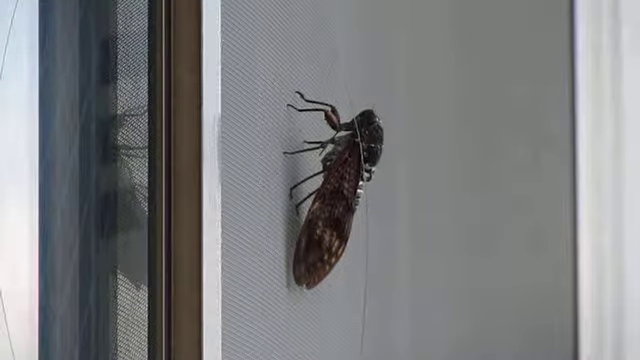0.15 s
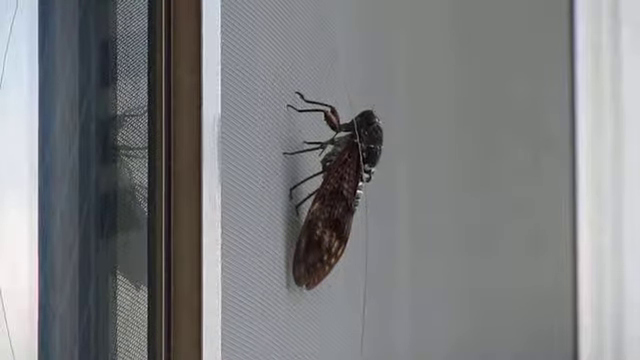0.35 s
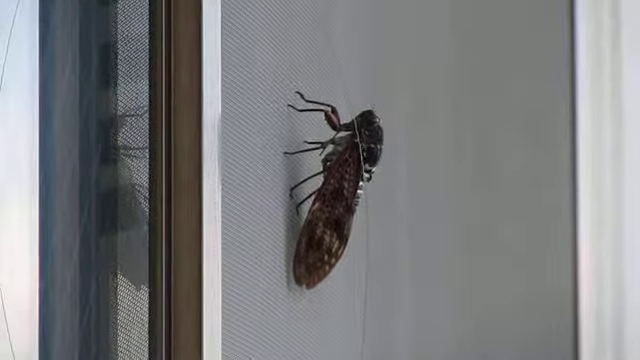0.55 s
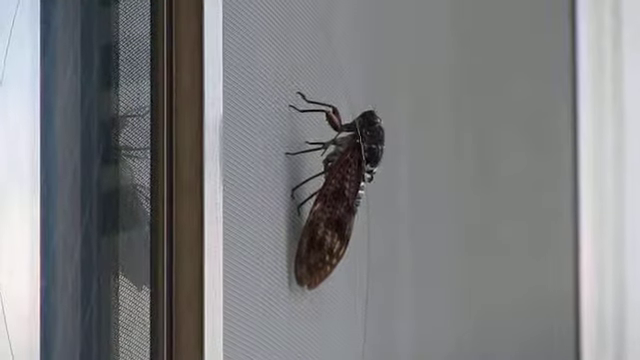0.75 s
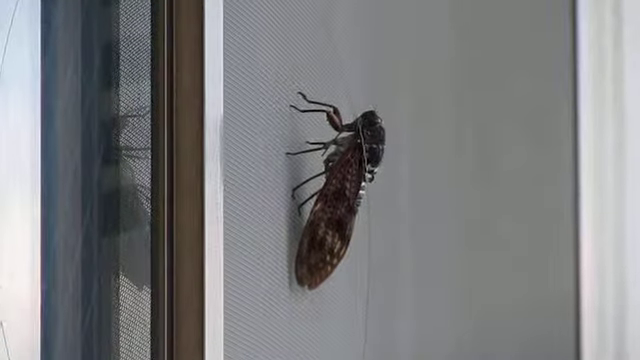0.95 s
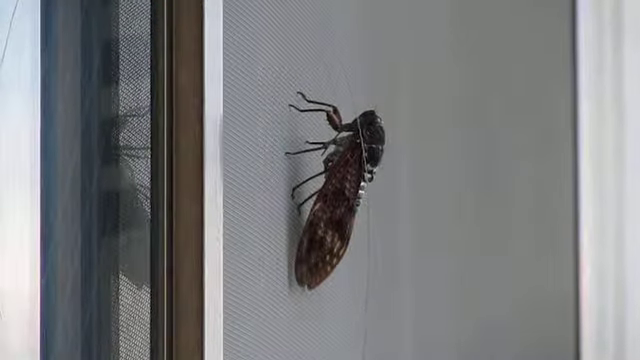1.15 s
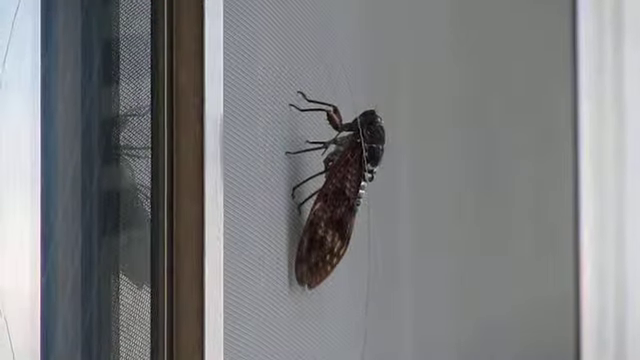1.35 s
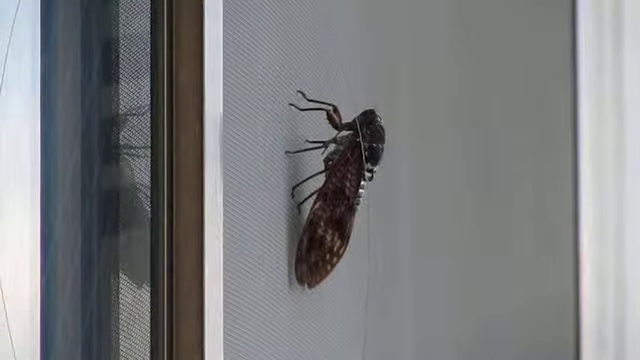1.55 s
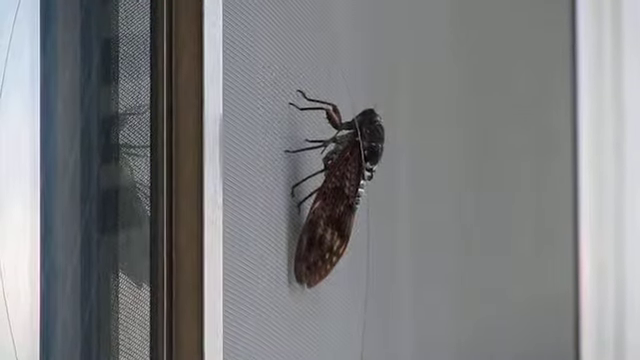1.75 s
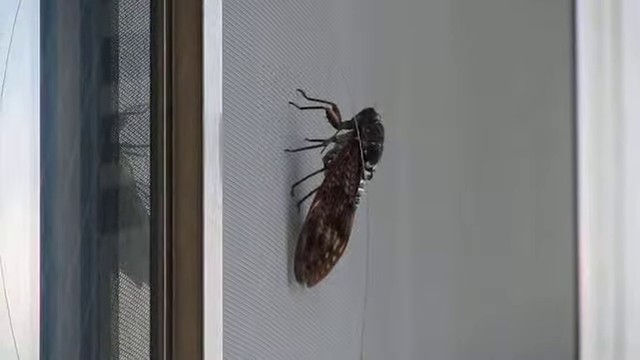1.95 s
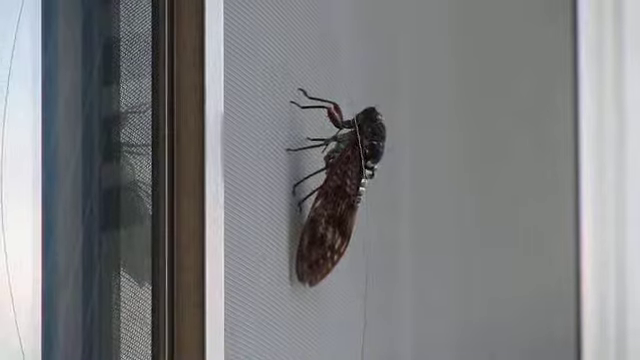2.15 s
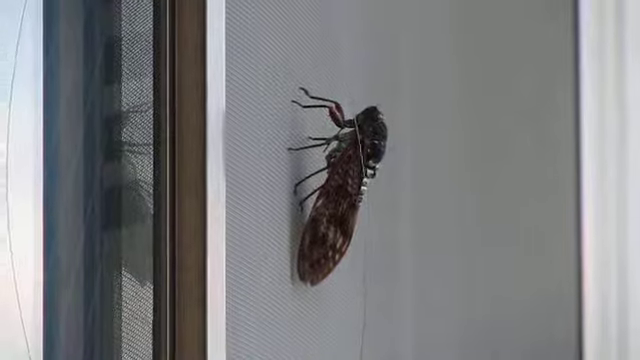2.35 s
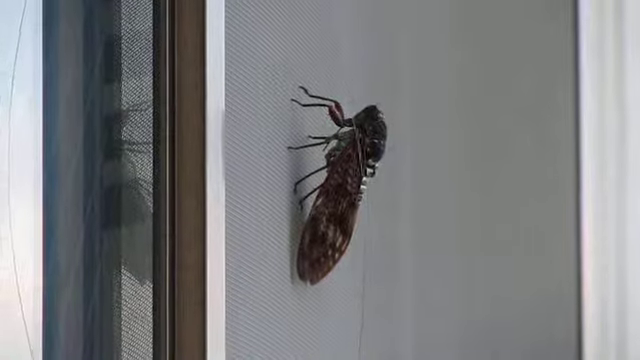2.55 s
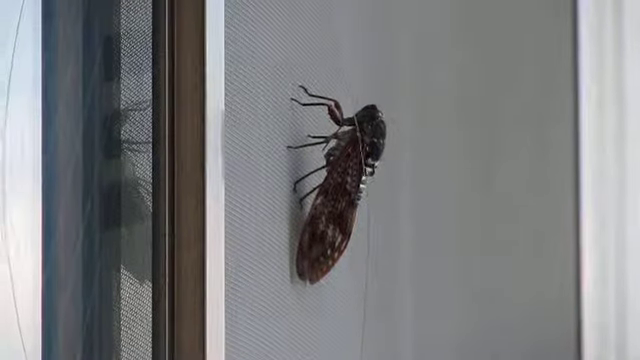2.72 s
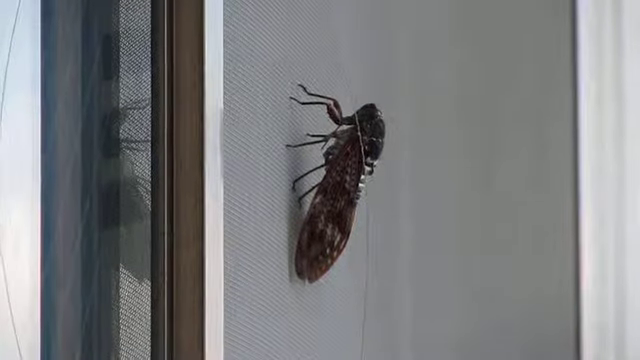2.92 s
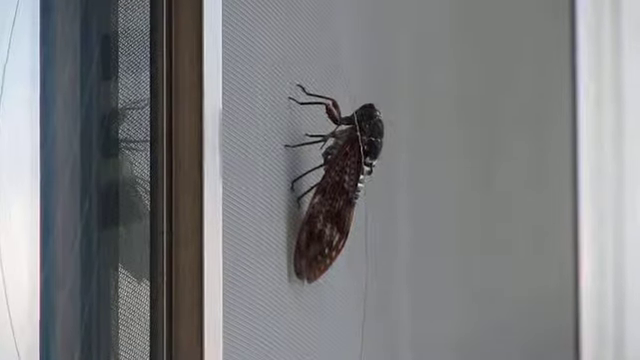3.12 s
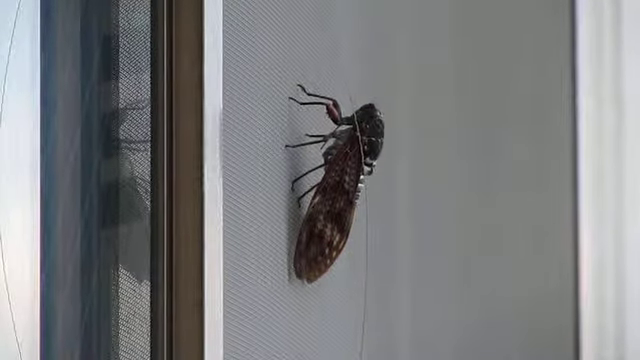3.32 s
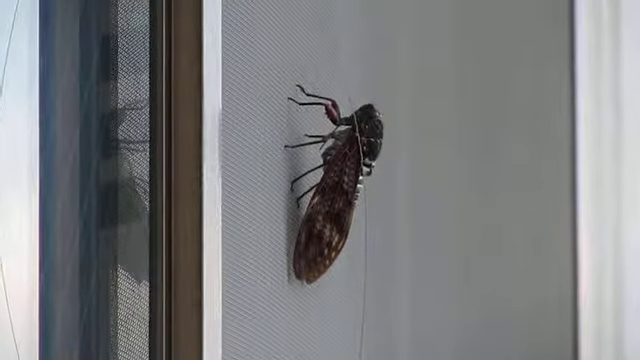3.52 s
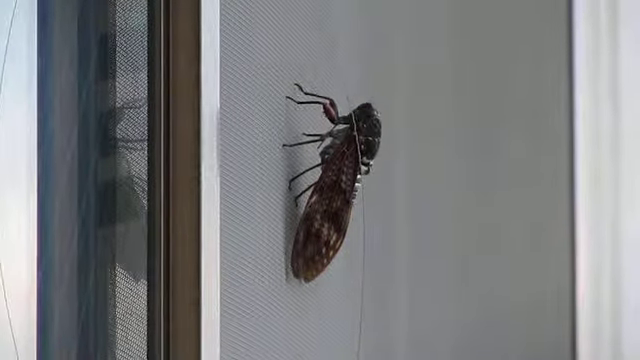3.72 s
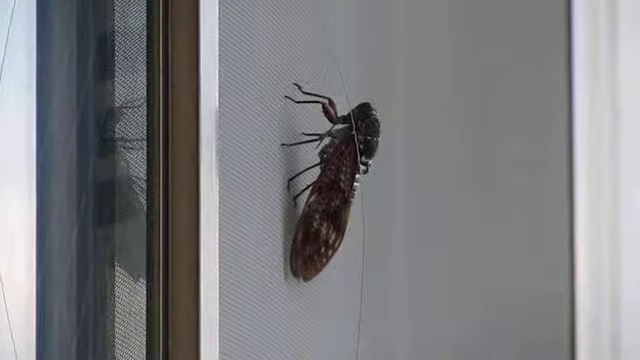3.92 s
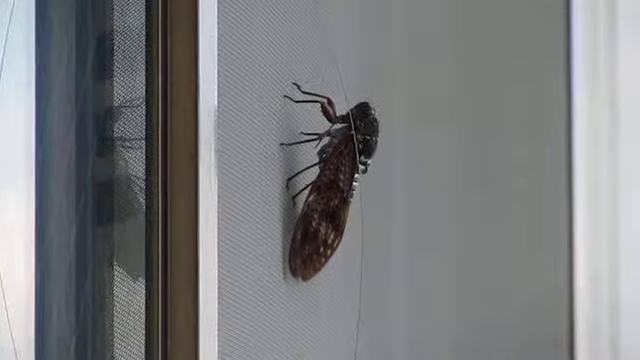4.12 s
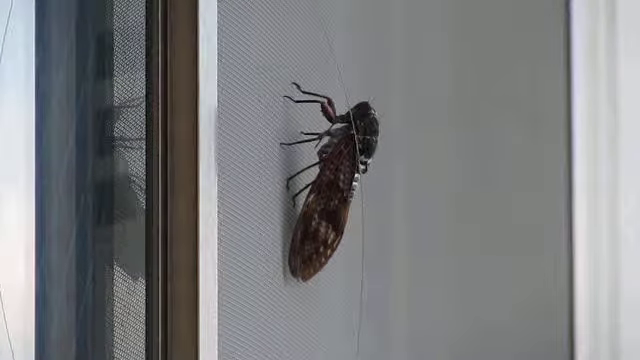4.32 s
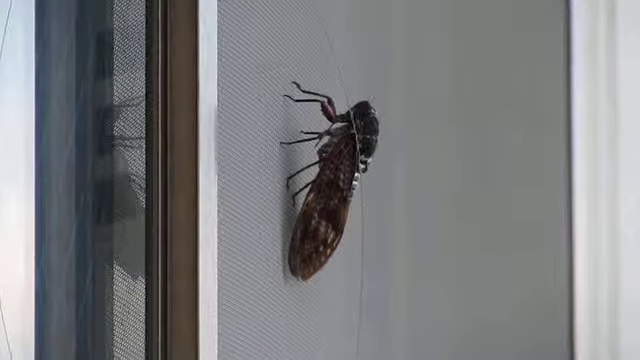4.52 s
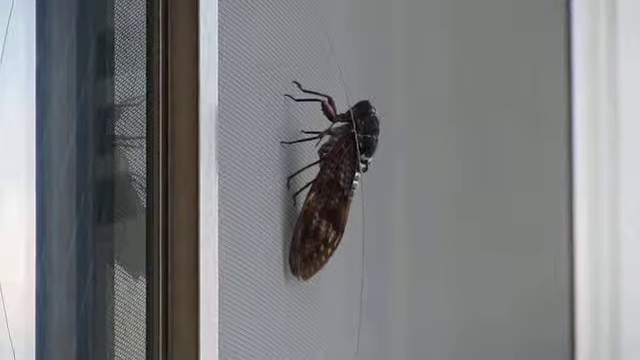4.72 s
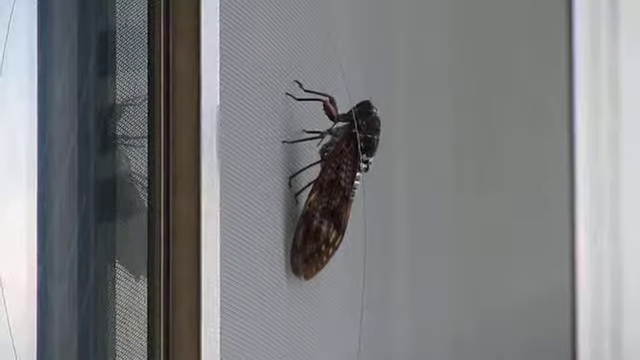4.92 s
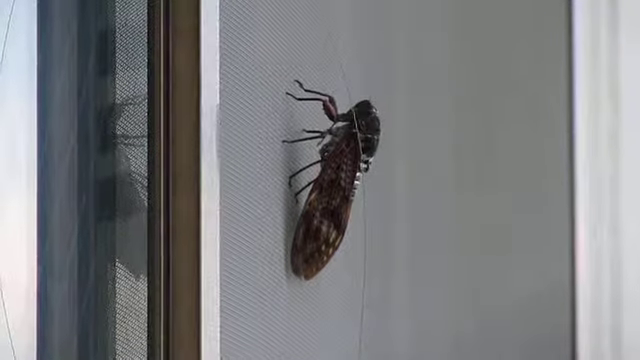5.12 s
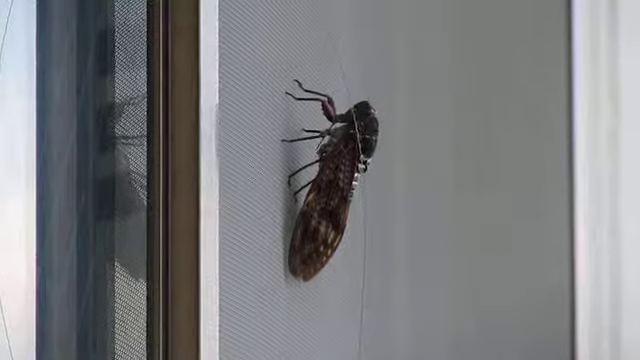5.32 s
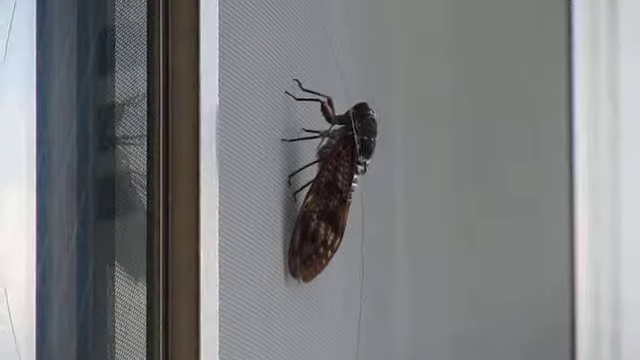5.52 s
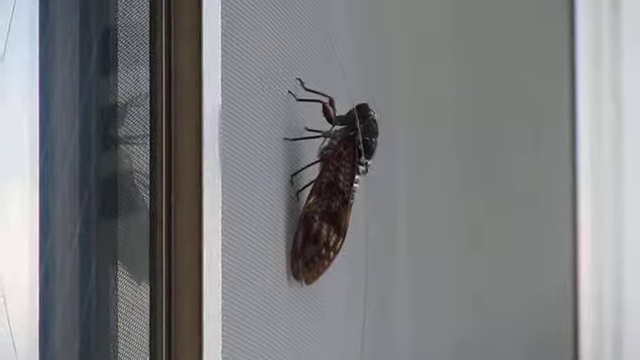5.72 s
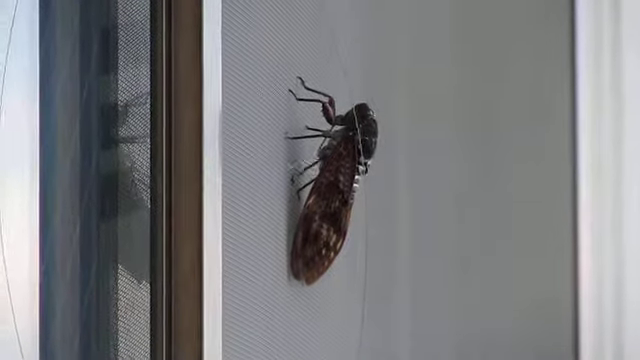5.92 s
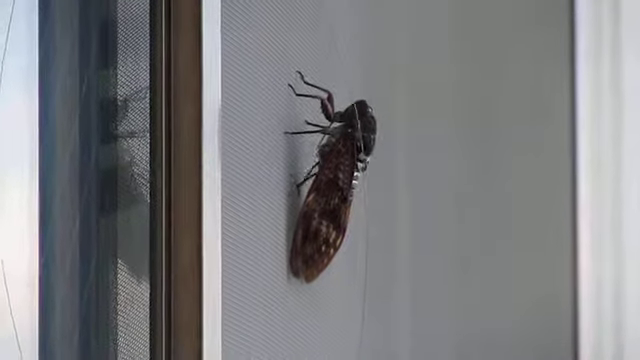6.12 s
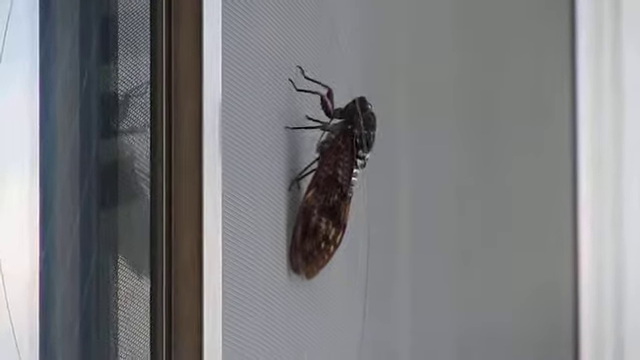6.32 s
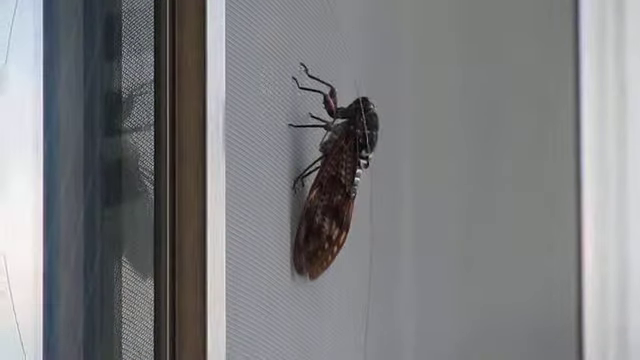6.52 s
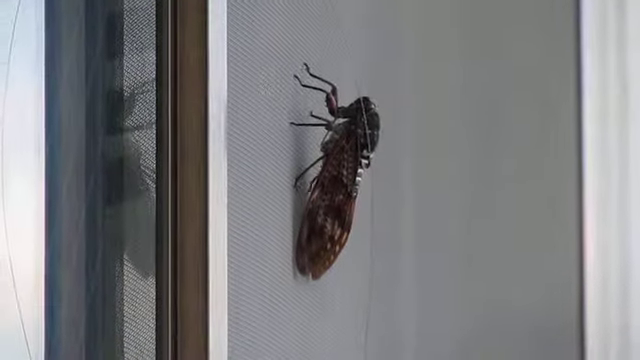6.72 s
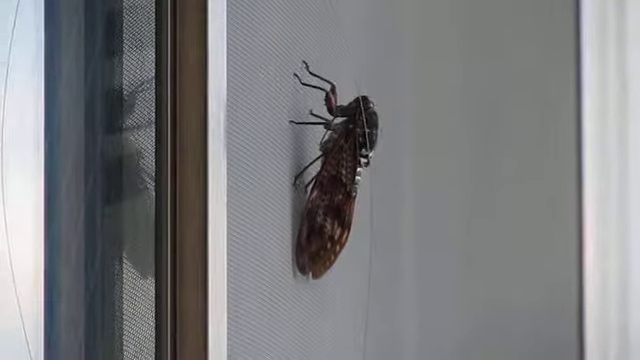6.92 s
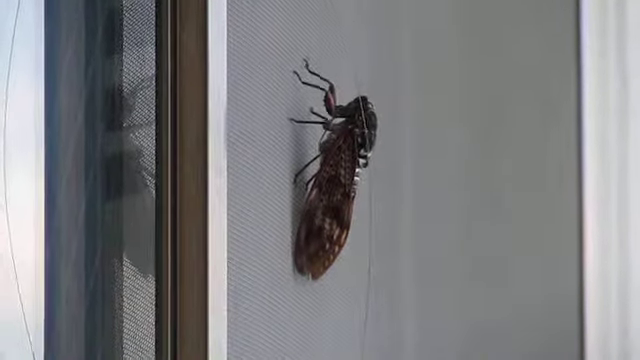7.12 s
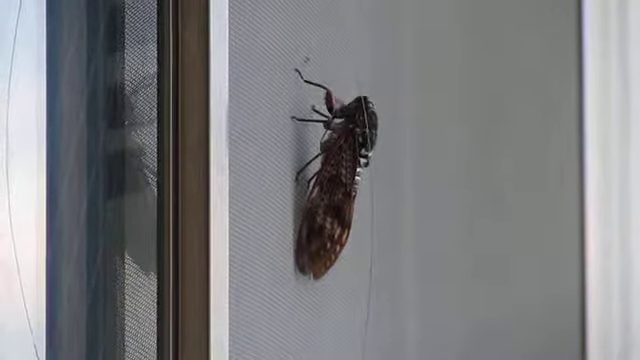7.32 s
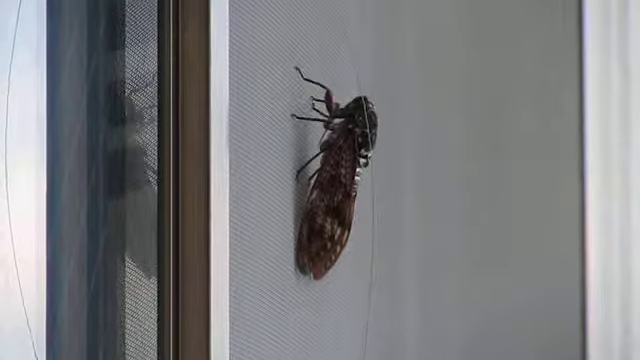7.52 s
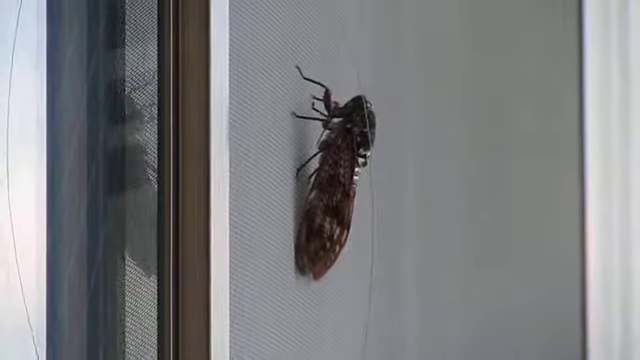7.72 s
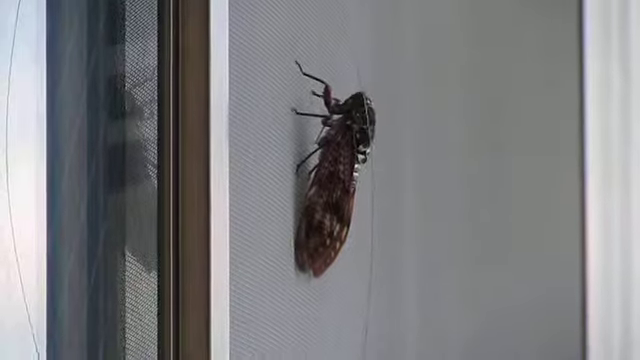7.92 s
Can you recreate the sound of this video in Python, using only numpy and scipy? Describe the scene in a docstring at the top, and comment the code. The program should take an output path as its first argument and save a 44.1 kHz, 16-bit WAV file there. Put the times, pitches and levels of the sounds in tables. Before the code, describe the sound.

A cicada sings very close to the microphone on a window screen for about eight seconds. From 0 to 2.8 s it gives regular, bright, sizzling chirps, roughly sixteen a second, each a short burst of dry clicks rising in pitch, strongest around 5 to 6 kHz. Near 2.85 s the rhythm stumbles into quick, tiny chirps and a short trill; a longer rasp follows at 3.4 s. More stutters come around 4.1 and 4.45 s. Longer buzzing trills stand out at 4.7, 5.4, 6.05, 6.7 and 7.35 s, between runs of increasingly short, clicky, slightly lower and softer chirps, which continue to the end. Tight window echoes add a hard, ringing edge. Far behind is steady low traffic rumble with a faint drone, a slight car rush near 3.3 s and another, fainter, near 7.3 s, plus barely audible dull thuds around 6.9 and 7.3 s.

```python
"""Cicada on a window screen

A cicada sings close by, some sixteen or more chirps a second, now and then a longer trill.
Each chirp is a run of clicks from two tymbals buckling in turn, each click exciting damped resonances;
the clicks slow and sink in pitch as the insect tires. The window recess adds echoes and standing waves.
Behind lie filtered-noise traffic rumble, tyre rush and drone, and a few faint narrow-band sounds."""
import sys
import numpy as np
from scipy import signal
from scipy.fft import rfft, irfft, next_fast_len
from scipy.io import wavfile

SR = 44100
rng = np.random.default_rng(int(sys.argv[2]) if len(sys.argv) > 2 else 0)


def dump_mix(stems):
    """Bounce the given channels to the path in sys.argv[1] as a 16-bit WAV at rate SR."""
    frames = np.atleast_2d(stems).T  # one column per channel
    limited = np.clip(frames, -1, 1)  # hard clip at full scale
    pcm = np.round(limited * 32767).astype(np.int16)
    wavfile.write(sys.argv[1], SR, pcm)


N = 351036

# spectrum of the distant traffic rumble: frequency_hz, relative_db
RUMBLE_SPECTRUM = [(20, -12), (70, -8.5), (95, -2.5), (115, -1), (160, 0), (215, 1.5), (310, -3),
                   (420, -10), (600, -24), (1000, -88)]
# swell and fade of that rumble: time_s, level_db (before an overall gain)
RUMBLE_LEVEL = [(0.0, -47.5), (0.51, -45), (0.95, -47.5), (1.51, -43.5), (2.13, -46.5), (2.37, -44.5),
                (2.77, -45.5), (3.94, -46), (4.86, -44.5), (5.14, -47.5), (6.47, -49.5), (6.78, -47.5),
                (7.96, -48)]
# spectrum of the tyre rush: frequency_hz, relative_db
TYRE_SPECTRUM = [(300, -9), (700, 3.5), (950, 1), (1300, -2.5), (2000, -3.5), (3500, -13.5), (8000, -29),
                 (11000, -40), (11900, -50)]
# far cars passing: nearest_s, stays_near_s, tyre_rush_db
CAR_PASSES = [(3.3, 0.86, -49), (7.35, 0.37, -54)]
# resonances of a steady far drone: frequency_hz, width_hz, relative_db
DRONE_MODES = [(541.8, 34, 4), (596.6, 28, 2)]
# faint tick, two thuds and far squeaks: centre_s, length_s, frequency_hz, width_hz, level_db
SMALL_SOUNDS = [(5.094, 0.012, 1290, 800, -42), (5.987, 0.3, 1403, 40, -58.5),
                (6.93, 0.058, 95.6, 111, -40), (7.34, 0.077, 120, 59.9, -42), (4.296, .07, 7560, 252, -59),
                (4.39, .09, 7780, 300, -61)]
# echoes from the screen, the pane and the frame: delay_s, gain (ratio)
WINDOW_ECHOES = [(.00103, 0.34), (.00183, 0.29), (.00342, 0.52)]
# standing waves of the window recess: frequency_hz, width_hz, gain_db
RECESS_MODES = [(2040, 40, 0), (2680, 70, 0), (2960, 70, -2), (4660, 50, -3), (4866, 45, 0), (4965, 45, 0),
                (5290, 55, -1), (5440, 50, -1), (5551, 40, 0), (5848, 60, 0), (6066, 40, -1), (6286, 45, 2),
                (6400, 45, -1), (6577, 55, -2), (6831, 50, -3)]
# how the hollow abdomen radiates a click: frequency_hz, gain_db
ABDOMEN_RADIATION = [(500, -38), (1900, -15), (2300, -7), (2700, -7.5), (3100, 0.5), (3800, -20),
                     (4300, -5.5), (4900, 2), (5800, 2.5), (6700, 2.5), (7500, 0), (9000, -6.5),
                     (11300, -13.5), (12100, -43.5)]
# resonances of the body and its air cavity, rung by every click: frequency_hz, decay_s, relative_db
BODY_MODES = [(2700, .00035, -17), (4950, .0005, -12)]
# the insect tires as it sings: time_s, effort (0-1)
SINGING_EFFORT = [(0, 1), (1.4, .87), (2.2, .73), (2.8, .68), (3.5, .5), (4.4, .43), (5.1, .2), (6.5, .09),
                  (8, 0)]

# Laws of effort: value when spent, value when fresh (both in the unit named), power of effort (no unit)
# buckling rate of each tymbal [clicks per s]
CLICK_RATE_LAW = (124, 168, 2.1)
# lag of the second tymbal behind the first [cycles]
TYMBAL_LAG_LAW = (.76, .57, 1.2)
# length of a regular chirp [s]
CHIRP_LENGTH_LAW = (.012, .033, 1.05)
# level of a chirp [dB, before an overall click gain]
CHIRP_LEVEL_LAW = (-24.5, -20, 0.6)
# nominal pitch at the opening of a chirp [Hz, before the tuning ratio]
OPENING_PITCH_LAW = (5520, 5810, 1.1)
# nominal pitch climb within a chirp, steep only at high effort [Hz, before the tuning ratio]
PITCH_CLIMB_LAW = (70, 840, 3.5)

# runs of evenly spaced chirps: start_s, period_s, count (chirps)
CHIRP_RUNS = [(-.0057, 0.062, 15), (0.9252, 0.062, 12), (1.6707, 0.062, 19), (3.0101, 0.06, 6),
              (3.489, .0583, 10), (4.142, 0.059, 5), (4.5616, 0.054, 3), (4.8189, .0564, 11),
              (5.5413, 0.055, 7), (5.9256, .046, 3), (6.1602, .053, 7), (6.5305, .049, 3),
              (6.8155, .053, 8), (7.236, .0435, 3), (7.47, .0556, 9)]
# off-beat chirps, where the rhythm stumbles: start_s, length_s, accent_db (over a regular chirp)
OFF_BEAT_CHIRPS = [(2.8454, .011, -1.5), (2.863, 0.0084, -5), (2.89, .012, 0), (2.9126, .007, -4),
                   (4.051, .013, -1.5), (4.08, 0.0222, 1.3), (4.122, .013, -2.5), (4.407, .009, -4),
                   (4.4418, .014, 0.5), (4.493, .038, -1)]
# trills, longer chirps that close most phrases:
# start_s, length_s, accent_db (over a regular chirp), nominal_climb_hz
LONG_TRILLS = [(2.934, .043, .2, 390), (3.3674, 0.073, 0, 151), (4.707, .063, 0.1, 738),
               (5.4077, 0.086, 0.1, 270), (6.0374, 0.066, 1.1, 400), (6.6693, 0.082, .9, 240),
               (7.3422, .064, 1, 520)]

# standard deviations from chirp to chirp; the rate's is a fraction
LENGTH_SCATTER_S, LEVEL_SCATTER_DB, RATE_SCATTER = .0012, 0.43, .025
TOP_HZ = 12230  # upper band limit


def amp(db):
    """Level to amplitude: 20 dB is a factor of ten."""
    return 10 ** (np.asarray(db) / 20)


def curve(points, s):
    """Linear interpolation of a (time, value) table at the times s."""
    knots, values = np.transpose(points)
    return np.interp(s, knots, values)


def spectrum_db(points, hz):
    """Interpolation of a (frequency, dB) table along a logarithmic frequency axis."""
    f, db = np.transpose(points)
    return np.interp(np.log(hz + 1), np.log(f + 1), db)


def filtered(x, response):
    """Linear filtering: the spectrum of x times a complex frequency response."""
    size = next_fast_len(N + SR // 2)
    f = np.fft.rfftfreq(size, 1 / SR)
    return irfft(rfft(x, size) * response(f), size)[:N]


def resonances(modes, f):
    """Superposition of causal second-order resonators, given as (Hz, width Hz, dB)."""
    return sum(amp(db) * 1j * f * width / (centre ** 2 - f ** 2 + 1j * f * width)
               for centre, width, db in modes)


def minimum_phase(points, size=2048):
    """Minimum phase: folding the cepstrum gives the most compact causal response of a given spectrum."""
    f = np.fft.rfftfreq(size, 1 / SR)
    cepstrum = irfft(np.log(amp(spectrum_db(points, f))))
    cepstrum[1:size // 2] *= 2
    cepstrum[size // 2 + 1:] = 0
    return irfft(np.exp(rfft(cepstrum)))


def noise(response):
    """Subtractive synthesis: white noise through a filter, scaled to rms 1."""
    coloured = filtered(rng.standard_normal(N), response)
    return coloured / np.sqrt(np.mean(coloured ** 2))


def outdoors():
    """Incoherent sources, the traffic rumble, tyre rush, bass and drone, add as independent noises."""
    t = np.arange(N) / SR
    rumble_gain_db, tyres_db, bass_db, drone_db = 1.57, -55.0, -54, -48.5
    rumble_level = amp(curve(RUMBLE_LEVEL, t) + rumble_gain_db)
    rumble = rumble_level * noise(lambda f: amp(spectrum_db(RUMBLE_SPECTRUM, f)))
    # the power of a passing car's rush falls with the square of its distance
    car_power = sum(amp(db) ** 2 / (1 + ((t - nearest) / near) ** 2) for nearest, near, db in CAR_PASSES)
    tyre_level = np.sqrt(amp(tyres_db) ** 2 + car_power)
    tyres = tyre_level * noise(lambda f: amp(spectrum_db(TYRE_SPECTRUM, f)))
    bass = amp(bass_db) * noise(lambda f: resonances([(58, 75, 0)], f))  # Hz, width Hz, dB
    drone = amp(drone_db) * noise(lambda f: resonances(DRONE_MODES, f))
    # distance takes the treble out of the low sounds, by half at 2000 Hz
    low = filtered(rumble + bass + drone, lambda f: 1 / (1 + (f / 2000) ** 2))
    return tyres + low


def small_sounds():
    """Narrow-band noise: each small sound is a resonance under a half-cosine swell."""
    t = np.arange(N) / SR
    out = np.zeros(N)
    for centre, length, hz, width, db in SMALL_SOUNDS:
        swell = np.cos(np.pi * np.clip((t - centre) / length, -.5, .5))
        # squaring the response steepens the sides of the band
        out += amp(db) * swell * noise(lambda f: resonances([(hz, width, 0)], f) ** 2)
    return out


def reverb(x, t60, onset):
    """Diffuse reverberation: decaying noise tails of energy 1 that shift as the microphone drifts."""
    hop = SR // 3
    t = np.arange(hop) / SR
    # overlapping half-sine fades keep the summed power constant
    fade = np.sin(np.pi * np.arange(2 * hop) / (2 * hop))
    padded = np.pad(x, (hop, SR))
    out = np.zeros(len(padded) + SR)
    for i in range(0, N + hop, hop):
        build_up = 1 - np.exp(-(t / onset) ** 2)
        tail = rng.standard_normal(hop) * amp(-60 * t / t60) * build_up
        tail /= np.linalg.norm(tail)
        wet = signal.fftconvolve(padded[i:i + 2 * hop] * fade, tail)
        out[i:i + len(wet)] += wet
    return out[hop:hop + N]


def window(song):
    """Reflection and resonance: surfaces echo the song, the recess rings on, the room answers faintly."""
    scatter_db, room_db = -1.0, -17

    def near_response(f):
        """Superposition of the direct sound, its delayed echoes and the standing waves."""
        echoes = sum(gain * np.exp(-2j * np.pi * f * delay) for delay, gain in WINDOW_ECHOES)
        return 1 + echoes + resonances(RECESS_MODES, f)

    near = filtered(song, near_response)
    scatter = amp(scatter_db) * reverb(song, t60=0.049, onset=0.002)
    room = amp(room_db) * reverb(song, t60=0.5, onset=0.024)
    return near + scatter + room


def by_effort(law, s):
    """Power law of muscular effort: a quantity between its spent and fresh values at time s."""
    spent, fresh, power = law
    effort = max(curve(SINGING_EFFORT, s), 1e-6)
    return spent + (fresh - spent) * effort ** power


def phrases():
    """Rhythm as periodic runs, stumbles and trills: rows start_s, length_s, accent_db, nominal_climb_hz."""
    rows = []
    for start, period, count in CHIRP_RUNS:
        for k in range(round(count)):
            s = start + k * period
            length = by_effort(CHIRP_LENGTH_LAW, s) + LENGTH_SCATTER_S * rng.standard_normal()
            accent_db = LEVEL_SCATTER_DB * rng.standard_normal()
            rows.append((s, length, accent_db, by_effort(PITCH_CLIMB_LAW, s)))
    for s, length, accent_db in OFF_BEAT_CHIRPS:
        rows.append((s, length, accent_db, by_effort(PITCH_CLIMB_LAW, s)))
    return rows + list(LONG_TRILLS)


def chirp(start, length, accent_db, climb_hz):
    """Alternate buckling of two tymbals under rising tension: rows time_s, level_db, nominal_pitch_hz."""
    jitter_s, click_scatter_db = .00017, .5
    rate = by_effort(CLICK_RATE_LAW, start) * (1 + RATE_SCATTER * rng.standard_normal())
    lag = by_effort(TYMBAL_LAG_LAW, start)
    k = np.arange(44)  # more clicks than the longest trill needs
    # even clicks are the first tymbal, odd ones the second; neither is quite on the beat
    t = (k // 2 + k % 2 * lag) / rate
    t = t + jitter_s * (k > 0) * rng.standard_normal(len(k))
    # the abdomen tightens from 11 to 65 % of the chirp and the pitch climbs
    tension = np.clip((t / length - 0.11) / (0.65 - 0.11), 0, 1)
    pitch = by_effort(OPENING_PITCH_LAW, start) + climb_hz * tension
    # chirps up to 25 ms stay level; beyond that they swell by 110 dB per second of extra length
    swell_db = 110 * max(length - .025, 0)
    level = by_effort(CHIRP_LEVEL_LAW, start) + accent_db + swell_db * (tension - .5)
    level = level + click_scatter_db * rng.standard_normal(len(k))
    # clicks in the last 3 ms are softer, by up to 2 dB, as the muscle lets go; none falls in the last 1 ms
    level = level - 3 * np.clip(1 - (length - t) / 0.003, 0, 1)
    sounding = (t < length - .001) & (start + t >= 0)
    return np.transpose([start + t, level, pitch])[sounding]


def ring(hz, decay):
    """Damped oscillation: a few milliseconds of a sine whose envelope peaks after its decay time."""
    t = np.arange(SR // 150) / SR
    envelope = t / decay * np.exp(1 - t / decay)
    return envelope * np.sin(2 * np.pi * np.reshape(hz, (-1, 1)) * t)


def cicada():
    """Impulsive excitation: every buckle cracks, rings the tymbal and rings the body behind it."""
    tuning, pitch_scatter = 0.98, 0.017  # ratio to nominal pitch, fraction from click to click
    crack_db, slack_db, click_gain_db = 6, 1.5, 2
    s, db, nominal_hz = np.vstack([chirp(*row) for row in phrases()]).T
    hz = nominal_hz * tuning * (1 + pitch_scatter * rng.standard_normal(len(s)))
    tymbal = ring(hz, decay=0.00036)
    body = sum(amp(level) * ring(mode_hz, decay) for mode_hz, decay, level in BODY_MODES)
    clicks = tymbal + body
    # a slacker, lower tymbal gives more crack for its ring; the crack is a single sample
    tightness = (hz - hz.mean()) / hz.std()
    clicks[:, 0] += amp(crack_db - slack_db * tightness)
    clicks *= amp(db + click_gain_db)[:, None]
    # add each click into the train at its own time
    where = np.round(s * SR).astype(int)[:, None] + np.arange(clicks.shape[1])
    train = np.bincount(where.ravel(), clicks.ravel(), N)[:N]
    return signal.fftconvolve(train, minimum_phase(ABDOMEN_RADIATION))[:N]


def scene():
    """Superposition of the outdoor background, the small sounds and the cicada at its window."""
    return (outdoors() + small_sounds() + window(cicada()))[None]


def record(dry):
    """Band limiting: nothing passes at or above the top frequency."""
    return filtered(dry[0], lambda f: f < TOP_HZ)[None]


dry = scene()
out = record(dry)
dump_mix(out)
```